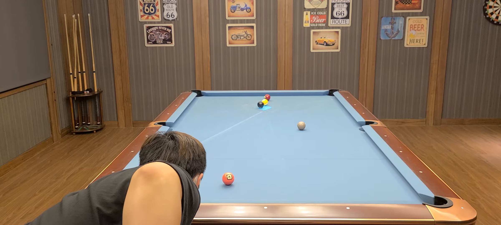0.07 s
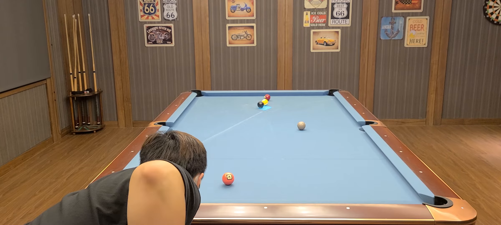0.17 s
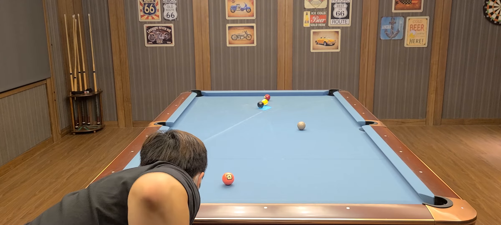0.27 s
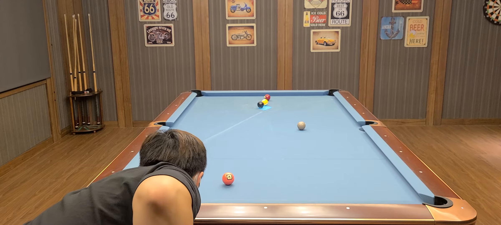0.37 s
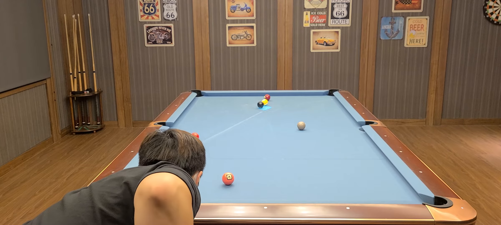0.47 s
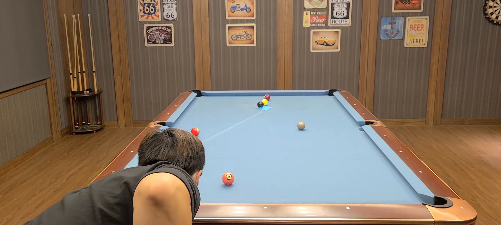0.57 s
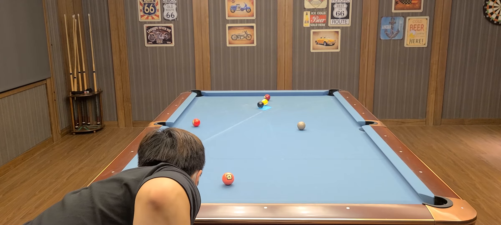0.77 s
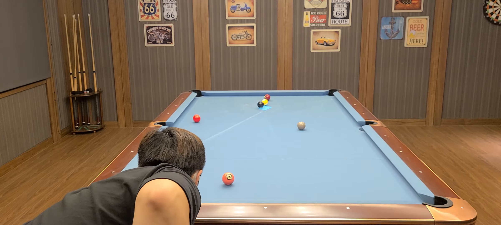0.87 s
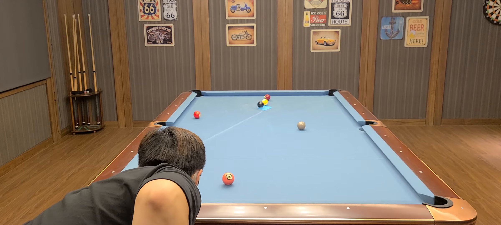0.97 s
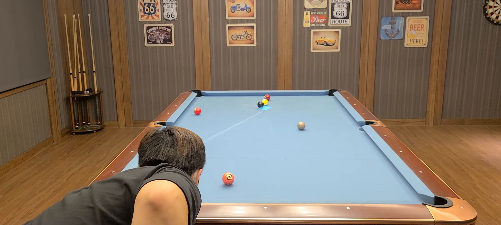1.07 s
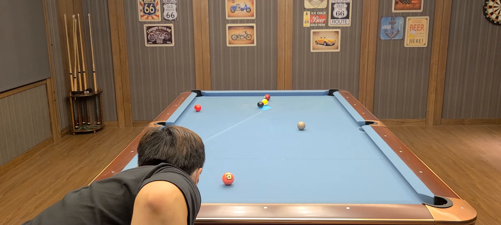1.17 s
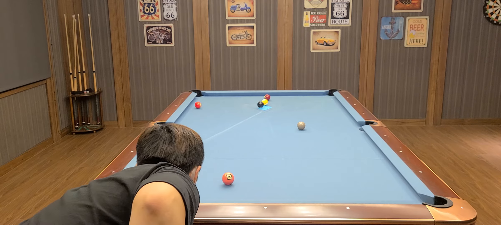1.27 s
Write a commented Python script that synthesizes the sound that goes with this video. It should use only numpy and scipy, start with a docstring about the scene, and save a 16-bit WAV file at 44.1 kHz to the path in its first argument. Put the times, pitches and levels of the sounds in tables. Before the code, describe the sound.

A pool shot heard from near the table: the cue taps the ball, which at once clacks loudly against another. Soft rolling and a few dull cushion thuds follow, over the low ventilation drone of a quiet room.

```python
"""A quiet, wood-panelled pool room, with the low drone of its ventilation. The cue knocks the cue ball,
and the impulse sets the shaft ringing in its normal modes. An eighth of a second later the ball
cracks against another in an elastic collision; walls and ceiling return the pulse as early echoes,
then as reverberation. The balls rumble over the slate and bump the cushions."""
import sys
import numpy as np
from scipy import signal
from scipy.fft import rfft, irfft
from scipy.io import wavfile

SR = 44100
rng = np.random.default_rng(int(sys.argv[2]) if len(sys.argv) > 2 else 0)


def dump(signal):
    """Clip the signal to [-1, 1] and save it as 16-bit WAV at the path in sys.argv[1]."""
    limited = np.clip(np.atleast_2d(signal).T, -1, 1)
    pcm = np.round(limited * 32767).astype(np.int16)
    wavfile.write(sys.argv[1], SR, pcm)


N = 57330
T, FREQS = np.arange(N) / SR, np.fft.rfftfreq(2 * N, 1 / SR)


def amp(db):
    """Amplitude ratio of a level in decibels."""
    return 10 ** (np.asarray(db) / 20)


def unit_rms(x):
    """Normalisation to rms 1."""
    return x / np.sqrt(np.mean(x ** 2) + 1e-20)


def curve(points, hz):
    """Interpolation on a log-frequency axis."""
    f, value = np.transpose(points)
    return np.interp(np.log(hz + 1), np.log(f), value)


def decay(t, t60):
    """Exponential damping: 60 dB in t60 seconds."""
    return np.exp(-np.log(1000) * np.maximum(t, 0) / t60)


def strike(start, rise, t60):
    """Impact envelope: linear rise, exponential decay (times in s)."""
    return np.clip((T - start) / rise, 0, 1) * decay(T - start, t60)


def noise(correlation, spectrum=None):
    """Partially coherent stereo noise of rms 1, from independent mid and side signals."""
    a, b = rfft(rng.standard_normal((2, 2 * N)))
    rho = np.clip(curve(correlation, FREQS), -1, 1)
    mid, side = a * np.sqrt(1 + rho), b * np.sqrt(1 - rho)
    colour = 1 if spectrum is None else amp(curve(spectrum, FREQS))
    return unit_rms(irfft(np.array([mid + side, mid - side]) * colour)[:, :N])


# Spectral density of the drone: f/Hz, relative level/dB
DRONE_SPECTRUM = [(25, -27), (45, -1), (60, -8.5), (95, -0.5), (145, -0.5), (185, -12.5), (300, -16),
                  (430, -25.5), (800, -26.5), (1100, -25.5), (2200, -33.5), (4500, -45), (8000, -56.5),
                  (15500, -59.5)]
# Interaural correlation of the drone: f/Hz, coefficient
DRONE_CORRELATION = [(30, 0.94), (100, 1), (300, 0.91), (700, 0.18), (2000, 0.1), (15000, 0.16)]


def ventilation():
    """Stationary random noise: a low drone with a faint hiss."""
    return amp(-41.5) * noise(DRONE_CORRELATION, DRONE_SPECTRUM)


# Spectral densities of the tip's knock and the chalk's hiss: f/Hz, relative level/dB
KNOCK_SPECTRUM = [(60, -16), (220, -0.5), (700, 1), (1400, -1.5), (2500, -6.5), (3800, -18.5), (7000, -34),
                  (15500, -60)]
CHALK_SPECTRUM = [(1500, -31), (3800, -5.5), (4800, 2), (6500, -10), (9000, -16), (15500, -26)]
# Interaural correlation of both: f/Hz, coefficient
TIP_CORRELATION = [(200, 0.96), (900, 0.85), (2000, 0.11), (6000, 0.18)]
# Normal modes of the shaft: f/Hz, relative level/dB, T60/s
SHAFT_MODES = [(436, -2, 0.093), (610, -2, 0.036), (799, -7, 0.12), (996, -4, 0.1), (1248, -3, 0.11),
               (1468, -5, 0.32), (1770, -2.5, 0.1), (2005, -2, 0.16), (2380, -11.5, 0.43),
               (2680, -14.5, 0.1), (3050, -26, 0.095), (3390, -12, 0.1), (3970, -18, 0.08),
               (4580, -6.5, 0.025)]


def cue(start=.2370, tick_start=.2447):
    """Impulse excitation: the tip knocks and scrapes; the shaft rings in damped modes and ticks once."""
    knock = amp(-20) * noise(TIP_CORRELATION, KNOCK_SPECTRUM) * strike(start, rise=.0018, t60=.15)
    chalk = amp(-28) * noise(TIP_CORRELATION, CHALK_SPECTRUM) * strike(start, rise=.016, t60=.089)
    ring = np.zeros(N)
    for hz, db, t60 in SHAFT_MODES:
        phase = 2 * np.pi * (hz * (T - start) + rng.random())
        ring += amp(db) * strike(start, rise=.0061, t60=t60) * np.sin(phase)
    t = T - tick_start
    tick = amp(-22.5) * np.exp(-(t / .00029) ** 2) * np.sin(2 * np.pi * 5440 * t)  # Gaussian tone burst
    direct = knock + chalk + amp(-22) * ring + tick
    return direct + amp(-2) * reverberation(direct)


# Reverberation time: f/Hz, T60/s
ROOM_T60 = [(100, 0.38), (400, 0.59), (900, 0.56), (1500, 1), (2700, 1), (5000, 0.61), (8000, 0.58),
            (13000, 0.36)]
# Interaural correlation of the diffuse field: f/Hz, coefficient
ROOM_CORRELATION = [(100, 0.96), (300, 0.87), (700, 0.53), (1300, 0), (15000, 0.025)]


def reverberation(x, gap_s=.0058, build_s=.016):
    """A diffuse field builds up, then decays at its own rate in each band."""
    hz, t, bands = signal.stft(noise(ROOM_CORRELATION), SR, nperseg=256)
    damping = decay(t, curve(ROOM_T60, hz)[:, None])
    tail = signal.istft(bands * damping, SR)[1][:, :N]
    tail *= np.clip((T - gap_s) / build_s, 0, 1)
    return signal.fftconvolve(x, unit_rms(tail) / np.sqrt(N), axes=1)[:, :N]


# Radiation response of the balls: f/Hz, relative level/dB
RADIATION = [(150, -28.5), (500, -17.5), (1000, -5), (2000, 5), (3000, 6), (3800, 1.5), (5500, -14.5),
             (8000, -12.5), (11000, -1), (12300, 14), (13300, 19), (15500, 0)]
# Directivity towards walls and ceiling: f/Hz, level/dB re the direct path
DIRECTIVITY = [(500, 2.5), (2000, -0.5), (3000, 0.5), (4000, 0.5), (5500, 6), (8000, 11), (11000, 8),
               (13300, 3.5), (15500, 4)]
# Reflection gain of the surfaces: f/Hz, level/dB
WALL_GAIN = [(500, -2.5), (1200, -0.5), (3500, -1), (5500, -16), (12000, -10), (13500, -3)]
# Early echoes: delay t/s, level/dB before directivity and reflection gain, right-ear lag t/s
ECHOES = [(.00212, -11.5, 0.013), (.00278, -22, 0.0049), (.00342, -13, .00008), (.0083, -24, -0.0076),
          (.00926, -4.5, .00008), (0.0114, -13, -0.0094), (0.0118, -2, -0.005), (.01944, -10.5, -0.0055),
          (0.0208, -2, .00002), (0.0311, -12, 0.017), (0.0298, -4, .00002), (.0441, -14.5, -0.0069),
          (0.0656, -17, 0), (0.0702, -13, 0)]


def crack(start=.36576, contact_s=.000385):
    """Hertzian contact: the balls radiate one pulse, which table, walls and ceiling reflect."""
    u = np.linspace(-.5, .5, 48)  # time as a fraction of the contact
    force = np.cos(np.pi * u).clip(0) ** 1.5
    force_spectrum = np.cos(2 * np.pi * np.outer(FREQS, u * contact_s)) @ force
    pulse = -force_spectrum * amp(curve(RADIATION, FREQS))
    pulse /= abs(irfft(pulse)).max()  # waveform peak of 1

    def arrival(delay, lag, gain=1):
        """Propagation delay along one path to each ear."""
        when = start + delay + np.array([[0], [lag]])
        return irfft(gain * pulse * np.exp(-2j * np.pi * FREQS * when))[:, :N]

    off_axis_db = curve(DIRECTIVITY, FREQS)
    reflected_db = off_axis_db + curve(WALL_GAIN, FREQS)
    echoes = sum(arrival(delay, lag, amp(db + reflected_db)) for delay, db, lag in ECHOES)
    diffuse = reverberation(arrival(0, 0, amp(6.5 + off_axis_db)))
    return arrival(0, lag=.00007) + echoes + diffuse


# Spectral density of the rumble: f/Hz, relative level/dB
ROLL_SPECTRUM = [(40, -13), (90, 2.5), (170, -4), (260, 1), (400, -2.5), (600, -9), (1200, -31.5),
                 (4000, -57)]
# Its envelope: t/s, level/dB
ROLL_ENVELOPE = [(.25, -49.5), (.37, -45), (.43, -31.5), (.5, -33.5), (.57, -40), (.66, -45), (.85, -51),
                 (1.3, -52)]


def rolling():
    """Rolling contact on cloth-covered slate: low noise that swells after the collision."""
    level_db = np.interp(T, *np.transpose(ROLL_ENVELOPE))
    return amp(level_db) * noise(ROOM_CORRELATION, ROLL_SPECTRUM)


# Impacts on the table and its cushions: t/s, level/dB, f/Hz, T60/s
BUMPS = [(.482, -29.5, 325.2, 0.35), (.537, -30.5, 99.5, 0.33), (0.656, -33, 85.3, 0.24),
         (.766, -26, 121.6, 0.065)]


def bumps():
    """Damped free vibration: each bump of a ball excites one low mode."""
    return sum(amp(db) * strike(start, rise=.0062, t60=t60) * np.sin(2 * np.pi * hz * (T - start))
               for start, db, hz, t60 in BUMPS)


def scene():
    """Linear superposition of the drone and the shot."""
    return ventilation() + cue() + crack() + rolling() + bumps()


# Microphone imbalance: f/Hz, left minus right level/dB
IMBALANCE = [(50, -0.5), (500, -1.5), (1200, 0.5), (2500, 0), (9000, 1.5), (13000, 3)]


def record(dry, cutoff_hz=15750):
    """Linear filtering: slightly unequal microphone responses, then a low-pass."""
    sensitivity = amp(np.array([[.5], [-.5]]) * curve(IMBALANCE, FREQS))
    heard = irfft(rfft(dry, 2 * N) * sensitivity)[:, :N]
    lowpass = signal.firwin(511, cutoff_hz, window=("kaiser", 9), fs=SR)
    return signal.oaconvolve(heard, lowpass[None], "same")


dry = scene()
out = record(dry)
dump(out)
```